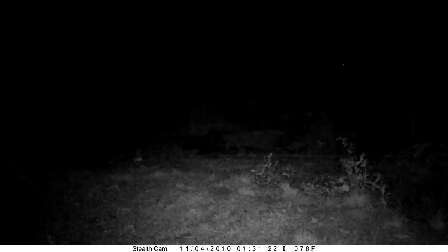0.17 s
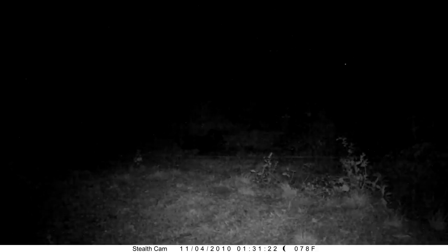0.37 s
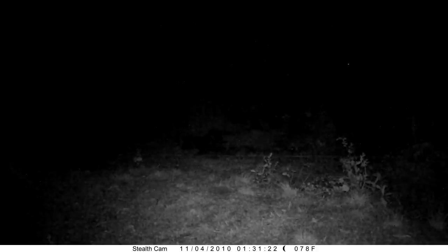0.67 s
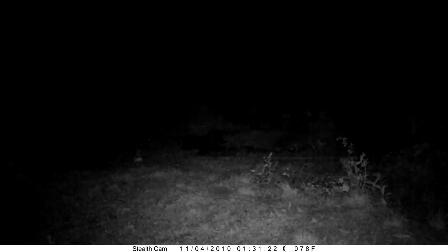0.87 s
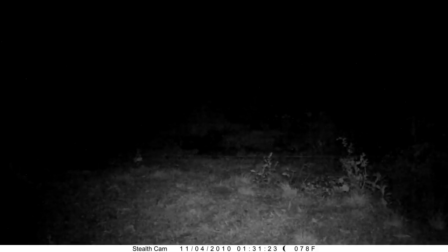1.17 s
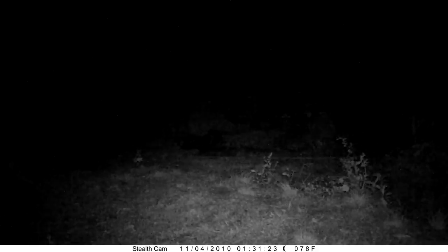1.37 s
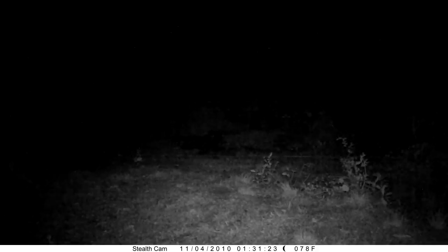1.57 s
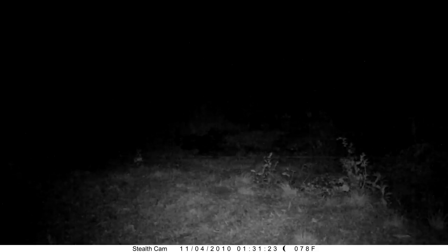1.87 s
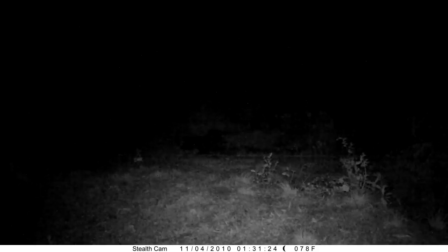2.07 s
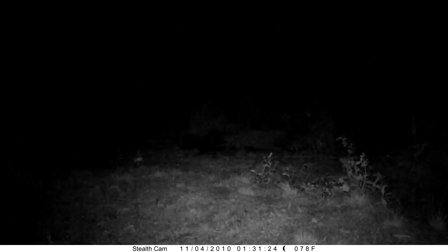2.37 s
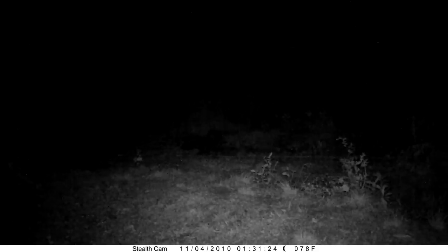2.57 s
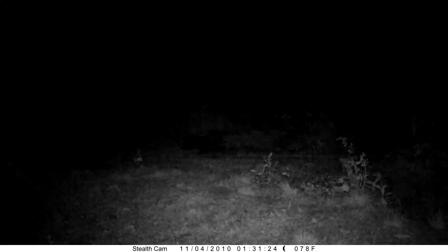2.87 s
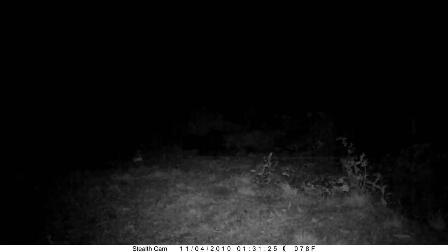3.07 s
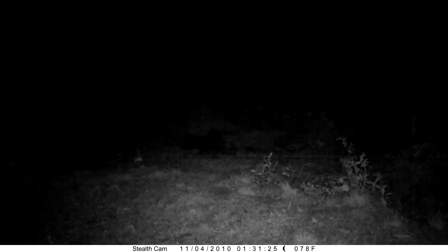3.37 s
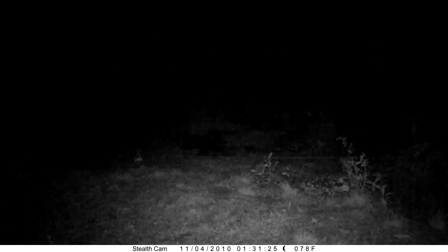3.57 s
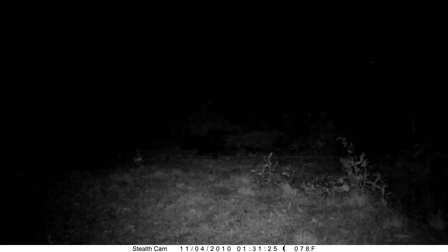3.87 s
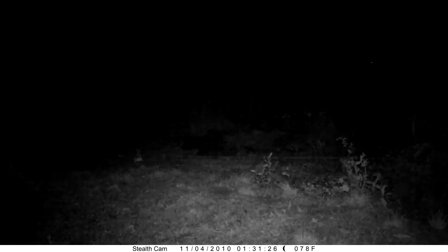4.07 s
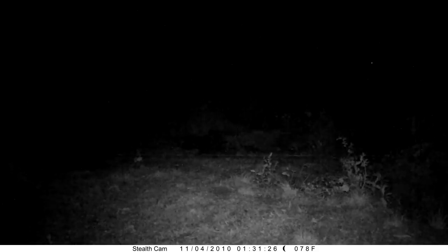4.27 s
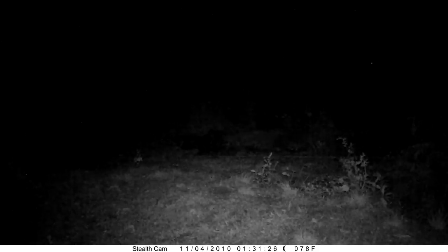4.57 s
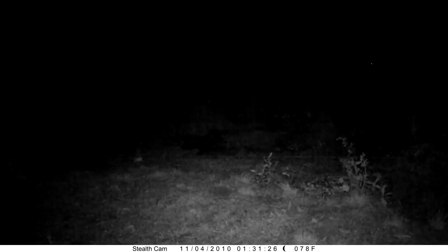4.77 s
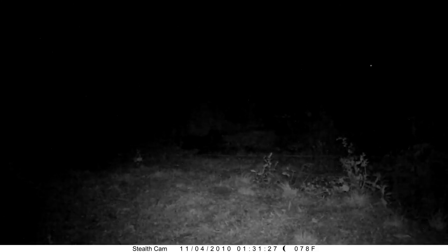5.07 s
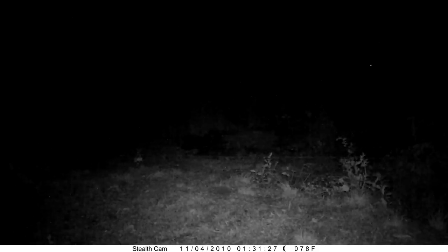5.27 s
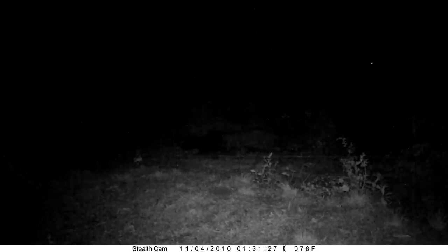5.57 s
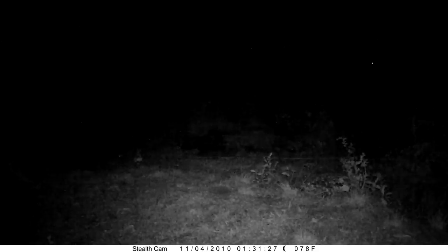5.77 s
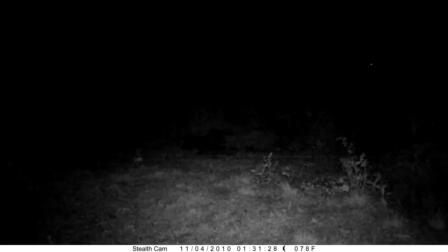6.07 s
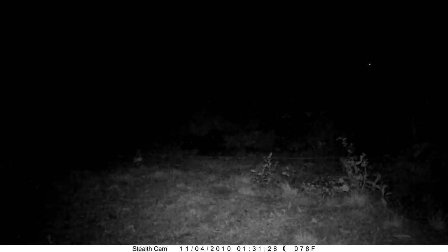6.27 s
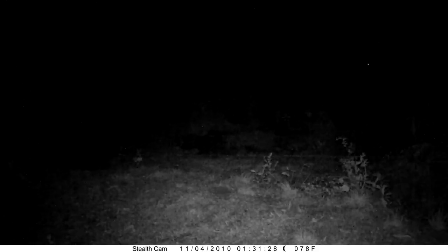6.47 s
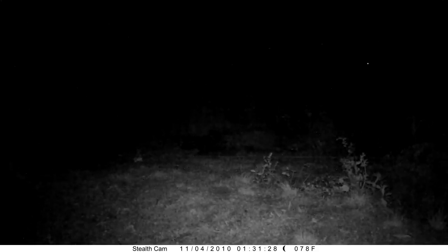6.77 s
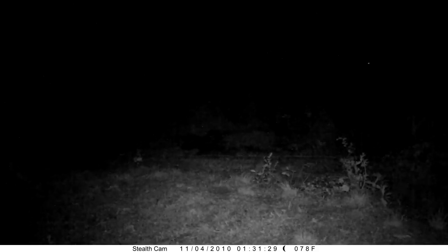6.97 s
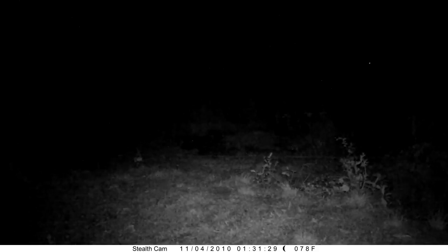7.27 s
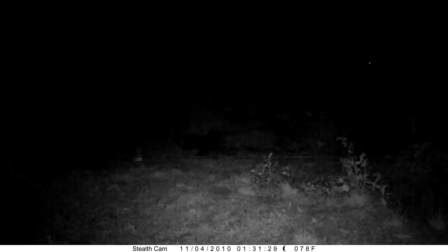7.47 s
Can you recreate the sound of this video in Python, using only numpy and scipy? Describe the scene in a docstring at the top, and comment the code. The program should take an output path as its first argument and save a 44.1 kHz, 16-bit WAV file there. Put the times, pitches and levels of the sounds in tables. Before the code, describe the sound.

Crickets trill steadily near and far in open grassland at night, over a faint hiss. A very high katydid rasps about twice a second, another insect buzzes about once a second, and one cricket chirps in short bouts. Something brushes through dry grass now and then, with soft steps and crackling stems in the second half. Near the end, two sharp clicks sound close to the microphone and echo briefly off the bushes.

```python
"""Crickets trill near and far as something brushes through dry grass at night.
The insects sing by scraping their wings: a high katydid rasps about twice a second, another
insect buzzes, and a cricket chirps in short bouts. Blades swish and stems crackle under soft
steps and taps. Late on, two sharp clicks close by echo off the bushes. A faint hiss lies beneath."""
import sys
import numpy as np
from scipy import signal
from scipy.fft import rfft, irfft, next_fast_len
from scipy.io import wavfile
from scipy.ndimage import map_coordinates

SR = 44100
rng = np.random.default_rng(int(sys.argv[2]) if len(sys.argv) > 2 else 0)


def transcribe(u):
    """Save the signal u as a 16-bit wav file named by the first command-line argument.

    u: samples, shape (n,) or (channels, n), limited to [-1, 1]; the rate is SR.
    q: integer samples, one column per channel.
    """
    v = np.clip(np.atleast_2d(u).T, -1, 1)
    q = np.round(v * 32767).astype(np.int16)
    wavfile.write(sys.argv[1], SR, q)


N = 336527
T = np.arange(N) / SR

# bands of far insects: centre f/Hz, half width/Hz, level/dB, flutter/dB
FAR_BANDS = [(1435, 120, -65, 1.5), (1740, 17, -69.5, 0.5), (2005, 68, -56.5, 0.9), (2246, 100, -56.5, 0),
             (2410, 150, -66, 2), (4350, 380, -66, 2.5), (4922, 310, -54.5, 0.7), (6070, 380, -60.5, 0.5),
             (7260, 475, -55.5, 1), (7994, 190, -60, 1.5)]
# trilling crickets: f/Hz, fall in a stroke/Hz, strokes/s, sounding share (0-1), level/dB, echo/dB
TRILLERS = [(2143, 290, 70.7, .45, -52.5, -1.5), (2087, 250, 80.4, .6, -55.5, -3.5),
            (4874, 520, 54.7, .5, -57.5, 1), (5010, 450, 60, .5, -62, -3), (7554, 900, 91.5, .45, -60.5, 2),
            (7720, 900, 38, .4, -62, 4)]
# bouts of chirps: start t/s, number of chirps, spacing/s, relative starting level/dB
CHIRP_BOUTS = [(.654, 1, .3, -57), (1.149, 4, .31, -60), (2.5, 1, .3, -60), (3.2, 3, .353, -55.5)]
# katydid rasps: start t/s, length/s
KATYDID_RASPS = [(-.07, 0.13), (.227, .14), (0.648, 0.23), (1.133, 0.15), (1.695, 0.24), (2.277, .19),
                 (2.727, .15), (3.02, .07), (3.17, .14), (3.532, 0.069), (3.778, .15), (4.221, .15),
                 (4.59, 0.24), (5.123, 0.16), (5.6, .15), (5.974, 0.14), (6.372, 0.079), (6.856, .16),
                 (7.28, 0.18)]
# soft taps and low thuds: t/s, f/Hz, relative level/dB
GROUND_TAPS = [(1.108, 1030, -57.5), (1.343, 1030, -58.5), (5.036, 1030, -57), (5.59, 860, -54.5),
               (5.79, 105, -65), (7.42, 141, -65)]
# brushes through the grass: peak t/s, fade/s, level/dB
GRASS_BRUSHES = [(.07, .11, -55), (.68, 0.084, -64), (1.6, .11, -60), (2.07, 0.19, -54.5),
                 (4.86, 0.23, -50.5), (5.97, 0.4, -57), (6.64, 0.2, -57.5)]
# soft steps: peak t/s, level/dB
SOFT_STEPS = [(.76, -72), (1.48, -70.5), (5.0, -61.5), (5.18, -64.5), (5.41, -61.5), (5.72, -67.5),
              (7.37, -61)]
# contacts that make up the two clicks: t/s, level/dB, time to fade by 60 dB/s, echo/dB
CLICK_CONTACTS = [(6.106, -37, 0.018, -26), (6.11, -33.5, 0.022, -12), (6.112, -37, 0.057, -14.5),
                  (6.407, -28, 0.073, -11), (6.419, -42, 0.045, -6.5)]
# tone colours, or how strong each frequency is: f/Hz, relative level/dB
HISS_TONE = [(15, -2.5), (60, -0.5), (200, 0), (550, -2.5), (900, 0.5), (1150, 1), (2800, 10), (3500, 4.5),
             (6000, 1), (8900, -26), (10500, -7.5), (12000, -8.5)]
BLADE_TONE = [(2000, -23), (4500, -3), (7000, 6), (10000, -2), (12000, -4.5)]
STEM_TONE = [(600, -29), (1500, 1.5), (3200, 7), (5500, 6), (9000, -17), (12000, -33)]
GROUND_TONE = [(30, -15), (130, -5), (380, -2.5), (580, -8), (1050, 4), (1600, -2), (4000, -13)]
CLICK_TONE = [(25, -13), (55, -5), (130, -8.5), (250, -1), (420, -1.5), (560, -8), (800, -2.5), (1250, 0.5),
              (1700, -9.5), (3600, 0.5), (5000, -4.5), (8600, -7.5), (10700, -6), (12000, -16.5)]
ECHO_TONE = [(40, -22), (130, -17), (250, -6.5), (560, -15), (1000, -4), (3000, 2), (5500, 4.5),
             (9000, -2.5), (12000, -8.5)]


def amp(db):
    """Turn decibels into a gain."""
    return 10 ** (np.asarray(db) / 20)


def unit(x):
    """Scale x to an average strength (rms) of 1."""
    return x / np.sqrt(np.mean(x ** 2) + 1e-20)


def wobble(rate):
    """A smooth curve through `rate` random points a second."""
    return map_coordinates(rng.standard_normal(int(N * rate / SR) + 4), [T * rate])


def swell(peak_s, rise_s, fade_s):
    """A smooth rise and fall around peak_s."""
    return np.exp(-((T - peak_s) / np.where(T < peak_s, rise_s, fade_s)) ** 2)


def filtered(x, response):
    """Scale each frequency in x by response(hz)."""
    size = next_fast_len(N + 8192)
    return irfft(rfft(x, size) * response(np.fft.rfftfreq(size, 1 / SR)), size)[:N]


def coloured(x, tone):
    """Give x a tone colour, at strength 1."""
    f, db = np.transpose(tone)
    return unit(filtered(x, lambda hz: amp(np.interp(np.log(hz + 1), np.log(f), db))))


def noise():
    """White noise."""
    return rng.standard_normal(N)


def band(centre_hz, width_hz):
    """Noise in a bell-shaped band of frequencies."""
    return unit(filtered(noise(), lambda hz: np.exp(-.5 * ((hz - centre_hz) / width_hz) ** 2)))


def echo(x, fade_s):
    """Grass and bushes scatter x into a blur about as strong, which drops 60 dB in fade_s."""
    t = T[:SR]
    tail = rng.standard_normal(SR) * amp(-60 * t / fade_s) * (1 - np.exp(-t / .0041))
    return signal.fftconvolve(x, tail / np.linalg.norm(tail))[:N]


def wing_strokes(pitch_hz, fall_hz, rate, share, unsteady):
    """Each stroke rings the wing for a share of the cycle; the pitch falls as the scraper slows."""
    cycle = np.cumsum(rate * (1 + unsteady * wobble(5))) / SR + rng.random()
    progress = np.minimum(cycle % 1 / share, 1)
    hz = pitch_hz * (1 + .012 * wobble(60)) + fall_hz * (.5 - progress)
    loudness = np.sin(np.pi * progress) * amp(1.5 * wobble(40))
    return unit(loudness * np.sin(2 * np.pi * np.cumsum(hz) / SR))


def hiss():
    """The faint, steady hiss of the night air."""
    return amp(-62.5) * coloured(noise(), HISS_TONE)


def far_chorus():
    """Countless distant insects blur into fluttering bands, one for each kind."""
    return sum(amp(db + flutter * wobble(45) + .17 * wobble(6)) * band(hz, width)
               for hz, width, db, flutter in FAR_BANDS)


def crickets():
    """The nearer crickets trill without pause, each with its own echo."""
    out = np.zeros(N)
    for hz, fall, rate, share, db, echo_db in TRILLERS:
        song = wing_strokes(hz, fall, rate, share, unsteady=.005)
        out += amp(db) * unit(song + amp(echo_db) * echo(song, fade_s=.2))
    return out


def buzzer(first_s=.838, first_gap_s=1, gap_s=1.108):
    """About once a second, tiny teeth strike in a fast run and make a wing ring high."""
    times = [first_s, *np.arange(first_s + first_gap_s, T[-1], gap_s)]
    effort = amp(-62) * sum(swell(s, rise_s=.052, fade_s=.052) for s in times)
    song = effort * wing_strokes(pitch_hz=8950, fall_hz=500, rate=230, share=.25, unsteady=.002)
    return song + amp(.5) * echo(song, fade_s=.3)


def chirper(pitch_hz=4204, fall_hz=654, stroke_s=.03, spacing_s=.046):
    """A cricket chirps: three scratchy wing strokes, each gliding down and louder than the last."""
    chirp_rise_db, stroke_rise_db, sag_hz = 1.1, 1.5, 60  # a bout grows louder and lower
    effort, glide_hz = np.zeros((2, N))
    progress = np.linspace(0, 1, int(stroke_s * SR))
    for s, chirps, gap, db in CHIRP_BOUTS:
        for chirp in range(chirps):
            for stroke in range(3):
                start = round((s + chirp * gap + stroke * spacing_s) * SR)
                span = slice(start, start + len(progress))
                gain = amp(db + chirp * chirp_rise_db + stroke * stroke_rise_db)
                effort[span] = gain * np.sin(np.pi * progress)
                glide_hz[span] = pitch_hz - chirp * sag_hz + fall_hz * (.5 - progress)
    rough_hz = glide_hz * (1 + .0493 * wobble(900))  # the wing's teeth strike unevenly
    song = effort * np.sin(2 * np.pi * np.cumsum(rough_hz) / SR)
    return amp(-1.5) * song + amp(-.5) * echo(song, fade_s=.3)


def katydid():
    """Fast, very high wing strokes swell into rasps that linger in the bushes."""
    effort = np.zeros(N)
    for s, length in KATYDID_RASPS:
        progress = np.clip((T - s) / length, 0, 1)
        effort += np.sqrt(np.abs(np.sin(np.pi * progress)))
    song = effort * wing_strokes(pitch_hz=9755, fall_hz=680, rate=62, share=.5, unsteady=.08)
    return amp(-64) * song + amp(-56) * echo(song, fade_s=.88)


def taps(fade_s=.047):
    """Soft touches on the ground die away too fast to ring."""
    out = np.zeros(N)
    for s, hz, db in GROUND_TAPS:
        age = np.maximum(T - s, 0)
        loudness = amp(db + 6 - 60 * age / fade_s) * (1 - np.exp(-age / .002))
        out += loudness * band(hz, .18 * hz)
    return out + amp(-6) * echo(out, fade_s=.35)


def grass(swishes_per_s=7000, snaps_per_s=2500):
    """Brushes mostly swish the blades; steps scuff the ground too. Both crackle the dry stems."""
    brush = sum(amp(db) * swell(s, rise_s=.075, fade_s=fade) for s, fade, db in GRASS_BRUSHES)
    each_step = [amp(db) * swell(s, rise_s=.074, fade_s=.15) for s, db in SOFT_STEPS]
    step = np.linalg.norm(each_step, axis=0)  # norm and hypot add sounds by their power
    blades = noise() * (rng.random(N) < swishes_per_s / SR) * amp(wobble(60))
    snaps = noise() * (rng.random(N) < snaps_per_s / SR) * amp(3.3 * wobble(60))
    stems = snaps + echo(snaps, fade_s=.086)  # the grass around blurs each snap
    ground = amp(wobble(30)) * coloured(noise(), GROUND_TONE)
    swish = (brush + step) * coloured(blades, BLADE_TONE)
    crackle = np.hypot(amp(-5.5) * brush, amp(3) * step) * coloured(stems, STEM_TONE)
    scuff = np.hypot(amp(-15) * brush, step) * ground
    return swish + crackle + scuff


def clicks(echo_fade_s=.6):
    """Each click is a few hard cracks, milliseconds apart; the bushes answer with a blurred echo."""
    crack, tail = np.zeros((2, N))
    for s, db, fade_s, echo_db in CLICK_CONTACTS:
        age = np.maximum(T - s, 0)
        crack += amp(db - 60 * age / fade_s) * (1 - np.exp(-age / .00066))
        tail += amp(db + echo_db - 60 * age / echo_fade_s) * (1 - np.exp(-age / .0043))
    return crack * coloured(noise(), CLICK_TONE) + tail * coloured(noise(), ECHO_TONE)


def scene():
    """Insects and stirrings in the grass over a faint hiss, the same in both channels."""
    mono = hiss() + crickets() + far_chorus() + katydid() + buzzer() + chirper()
    mono += grass() + taps() + clicks()
    return np.array([mono, mono])


def record(dry, top_hz=12150):
    """Cut away all the treble above top_hz."""
    return np.array([filtered(x, lambda hz: hz < top_hz) for x in dry])


dry = scene()
out = record(dry)
transcribe(out)
```